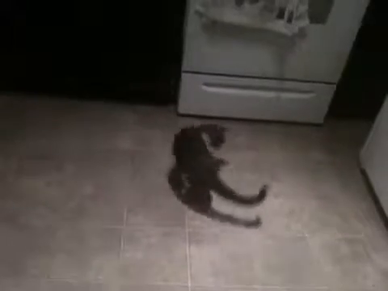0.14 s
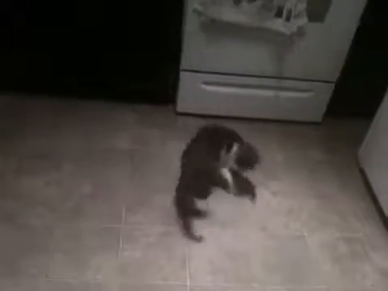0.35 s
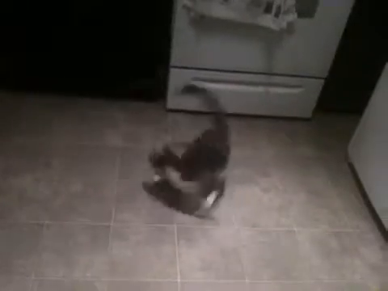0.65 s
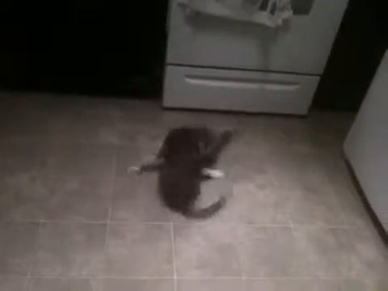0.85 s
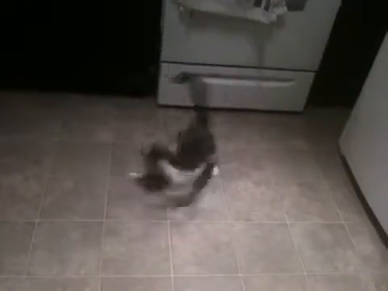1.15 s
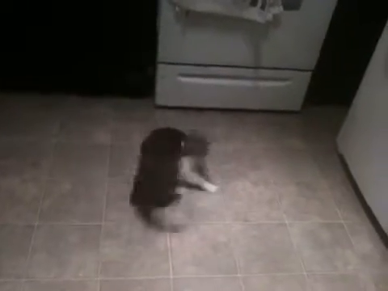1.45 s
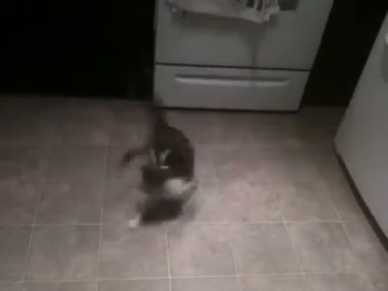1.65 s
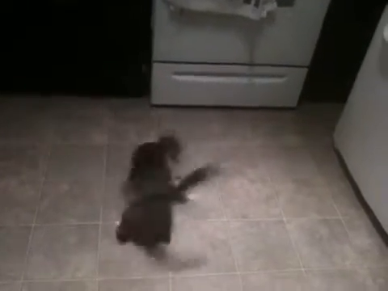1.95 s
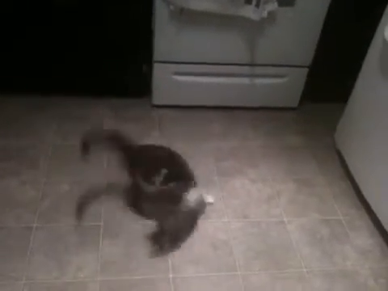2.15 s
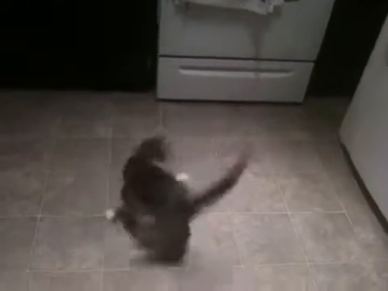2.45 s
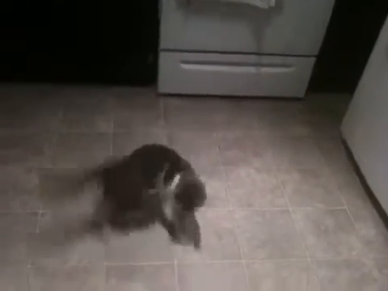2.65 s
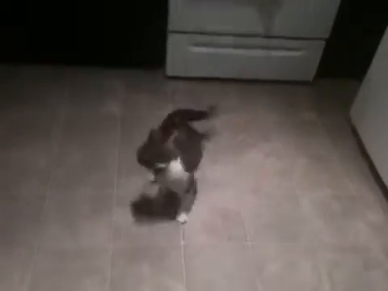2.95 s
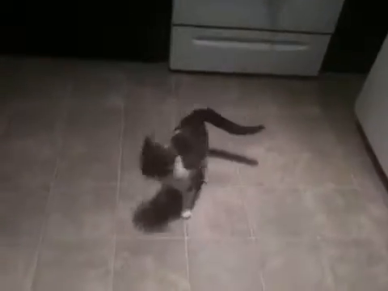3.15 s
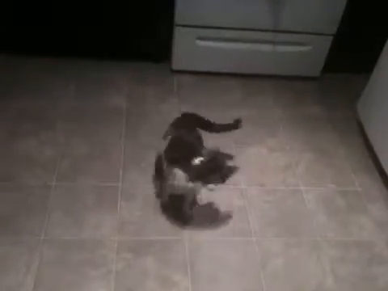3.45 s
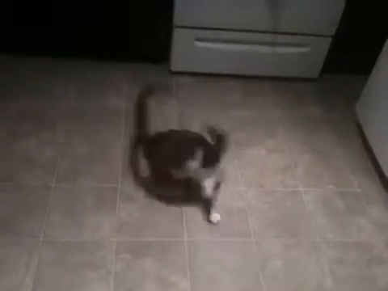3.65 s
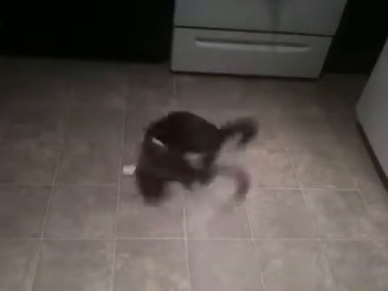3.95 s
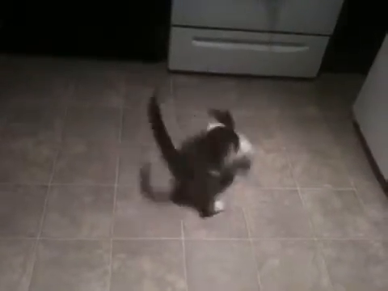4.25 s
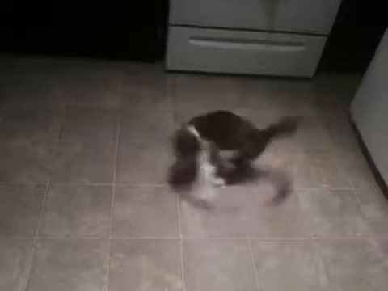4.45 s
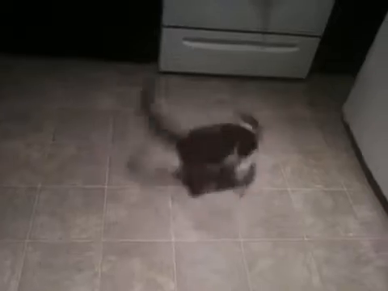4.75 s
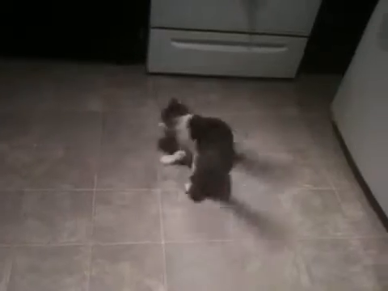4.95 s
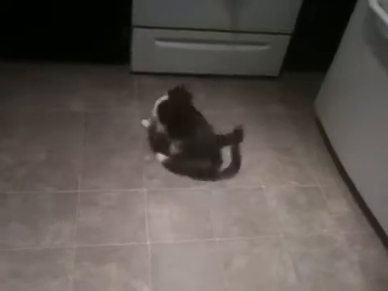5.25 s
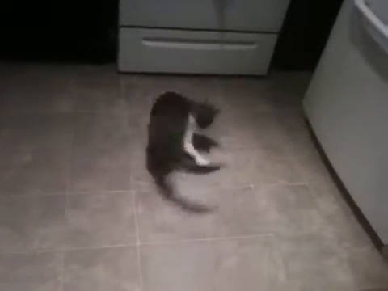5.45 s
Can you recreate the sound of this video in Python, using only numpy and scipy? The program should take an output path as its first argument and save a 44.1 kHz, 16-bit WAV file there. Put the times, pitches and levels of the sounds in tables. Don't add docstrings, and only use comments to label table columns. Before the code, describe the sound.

A kitten whirls after its tail on a tiled kitchen floor. Its tiny collar bell gives high, dry, clattering jingles in irregular clusters, densest in the first half, while soft low paw thuds, pad slaps and claw ticks patter beneath. The jingling thins toward the end, leaving a few steps and a sliding scuff. The hard room adds short reverberation; a small handheld microphone adds hiss and a very faint high whine.

```python
import sys
import numpy as np
from scipy import signal
from scipy.fft import rfft, irfft, next_fast_len
from scipy.io import wavfile
from scipy.ndimage import uniform_filter1d

SR = 44100
rng = np.random.default_rng(int(sys.argv[2]) if len(sys.argv) > 2 else 0)


def volts_from_decibels(level):
    exponent = np.asarray(level, float) / 20
    return 10 ** exponent


def unload_wav(signal):
    wavfile.write(
        sys.argv[1],
        SR,
        np.round(np.clip(np.atleast_2d(signal).T, -1, 1) * 32767).astype(np.int16),
    )


N = 246959

# mode_hz, t60_s
SHELL_MODES = [(6470, 0.024), (6800, 0.0072), (15000, 0.035), (15400, 0.021)]
# mode_hz, level_db, t60_s, phase_turns
CLACK_MODES = [(6060, -3, 0.0027, 0), (7090, 11, 0.0015, 0.08), (8100, -10.5, 0.0015, 0.53),
               (5300, -9, 0.0015, 0.14)]


def evened(x):
    return x / np.sqrt(np.mean(x ** 2) + 1e-20)


def read(points, hz):
    f, value = np.transpose(points)
    return np.interp(np.log(hz + 1), np.log(f + 1), value)


def curve(rows, index):
    rows = np.array(rows)
    return np.interp(np.arange(N) / SR, rows[:, 0], rows[:, index])


def add(mix, s, sound):
    part = mix[round(s * SR):][:len(sound)]
    part += sound[:len(part)]


def ring(t, hz, db, t60, turn=0):
    return volts_from_decibels(db - 60 * t / t60) * np.sin(2 * np.pi * (hz * t + turn))


def band_pass(x, order, low_hz, high_hz):
    return signal.sosfilt(signal.butter(order, [low_hz, high_hz], "band", fs=SR, output="sos"), x)


def coloured(x, points):
    size = next_fast_len(len(x))
    gain = volts_from_decibels(read(points, np.fft.rfftfreq(size, 1 / SR)))
    return evened(irfft(rfft(x, size) * gain, size)[:len(x)])


def grains(per_s, spread_db):
    size = volts_from_decibels(spread_db * np.minimum(rng.exponential(1, N), 4)) * rng.choice([-1., 1.], N)
    return size * (rng.random(N) < per_s / SR)


def camera_floor():
    # freq_hz, density_db
    air = [(12, -37), (20, -27), (70, -31.5), (106, -9.5), (181, -5.5), (214, -7), (433, -9.5),
           (699, -14.5), (1130, -17), (1630, -18.5), (2350, -18.5), (17000, -23)]
    # line_hz, rms_db
    whine_lines = [(14853, -93), (14912, -92), (14971, -86), (15030, -85), (15089, -93), (15148, -96)]
    t = np.arange(N) / SR
    whine = sum(np.sqrt(2) * volts_from_decibels(db) * np.sin(2 * np.pi * (hz * t + rng.random())) for hz, db in whine_lines)
    return volts_from_decibels(-67.5) * coloured(rng.standard_normal(N), air) + whine


def rattle():
    # time_s, level_db
    rolling = [(0.2, -65.5), (0.85, -69), (1.06, -49), (1.2, -52.5), (1.69, -53), (1.84, -59), (1.97, -71),
               (2.22, -47), (2.42, -50), (2.6, -49), (2.91, -55), (3.03, -48), (3.16, -66), (3.75, -51.5),
               (4.0, -64), (4.62, -48.5), (4.85, -58), (5.12, -80)]
    t = np.arange(3000) / SR
    sway = uniform_filter1d(uniform_filter1d(rng.standard_normal(N), 500), 500)
    jerks = volts_from_decibels(4.5 * np.clip(evened(sway), -3, 1.2))
    light_db = [-22.5, -10, -40, -53.5]
    modes = [(hz, db, life) for (hz, life), db in zip(SHELL_MODES, light_db)] + CLACK_MODES
    shell = np.zeros(N)
    for mode in modes:
        response = ring(t, *mode) * (1 - np.exp(-t / 0.00082)) ** 2
        shell += signal.oaconvolve(grains(300, 3.3) * jerks, response)[:N]
    spinning = abs(np.arange(N) / SR - 2.72) < 2.44
    return volts_from_decibels(curve(rolling, index=1) - 5) * evened(shell) * spinning


def kitchen(x):
    # freq_hz, t60_s
    decay = [(150, 0.36), (700, 0.3), (2000, 0.38), (6500, 0.35), (15000, 0.074)]
    taps, step = np.zeros((3, SR // 2)), 20
    slots = np.arange(200, SR // 2 - step, step)
    at = slots + rng.integers(0, step, (3, len(slots)))
    np.put_along_axis(taps, at, rng.choice([-1., 1.], at.shape), 1)
    hz, t, z = signal.stft(taps, SR, nperseg=512)
    tails = signal.istft(z * volts_from_decibels(-60 * t / read(decay, hz)[:, None]), SR, nperseg=512)[1]
    half_turns = 2.7 * np.arange(N) / SR + np.arange(3)[:, None] / 3
    turning = np.sqrt(2 / 3) * np.cos(np.pi * half_turns)
    return signal.fftconvolve(x * turning, tails / np.linalg.norm(tails[0]), axes=1)[:, :N].sum(0)


def strikes():
    # start_s, peak_db, twin_db (upper twin mode, relative), bouncing_t60_s
    shakes = [(.6806, -35.5, 26, 0.032), (1.007, -31.5, 4, 0.021), (1.0369, -28, 2, 0.043),
              (1.1508, -18.5, -39, 0.023), (1.1972, -31.5, -7, 0.018), (1.257, -28.5, -32, 0.0098),
              (1.3473, -31, 6, 0.041), (1.522, -31, 7, 0.032), (1.7566, -25, 1.5, 0.02),
              (2.0492, -31.5, 5, 0.051), (2.0572, -33, -6, 0.038), (2.2053, -22.5, 4, 0.03),
              (2.2538, -27.5, 9, 0.054), (2.2881, -23, 7, 0.013), (2.386, -21, 11, 0.011),
              (2.3935, -31, -1, 0.017), (2.4209, -29.5, -36, 0.0065), (2.4443, -32, 18, 0.024),
              (2.5412, -29.5, 3, 0.051), (2.7706, -27, 3, .017), (2.8015, -27, 8, 0.015),
              (2.9312, -29.5, 14, 0.01), (2.9892, -26.5, -24, 0.012), (3.0505, -30, -6, 0.039),
              (3.238, -30, 15, 0.013), (3.2735, -31, 0, 0.043), (3.7147, -32.5, -2, 0.031),
              (3.922, -35, 18, 0.042), (4.3879, -30.5, -4, 0.077), (4.4125, -27.5, 11, 0.043)]
    # start_s, peak_db, bouncing_t60_s
    further_shakes = [(.2907, -52.5, .022), (.5586, -54, 0.0084), (.7433, -41.5, 0.11), (.7876, -35, 0.019),
                      (.9315, -47.5, 0.012), (1.2261, -36, 0.019), (1.3269, -36, 0.021), (1.4691, -37.5, 0.088),
                      (1.6377, -35.5, 0.021), (1.6586, -31.5, 0.021), (1.7345, -42, 0.12), (2.005, -39, 0.022),
                      (2.6309, -45, 0.19), (2.7295, -34.5, 0.014), (2.9647, -39, 0.0028), (3.1727, -35.5, 0.13),
                      (3.1896, -36, 0.023), (3.3228, -47, 0.026), (3.4483, -35.5, 0.05), (3.5229, -40, 0.034),
                      (3.5438, -33, 0.02), (3.6728, -45, 0.05), (3.8844, -32, 0.069), (3.9872, -36, 0.054),
                      (4.04, -35.5, 0.016), (4.2219, -43, 0.033), (4.5052, -33.5, 0.015), (4.6384, -33, 0.0087),
                      (4.7476, -48, 0.041), (5.0494, -44, 0.038)]
    # start_s, peak_db
    stray_taps = [(.6983, -44), (.7763, -39), (1.3069, -36.5), (1.51, -37), (1.942, -49), (2.1859, -38),
                  (2.461, -34), (2.5232, -37.5), (2.6035, -35.5), (3.3623, -43), (3.514, -51), (4.153, -46),
                  (4.2383, -41), (4.6249, -46), (4.7765, -44.5), (5.4192, -54)]
    out, t = np.zeros(N), np.arange(5000) / SR
    common_twin_db, tap_t60_s = 3, .004
    rows = shakes + [(s, db, common_twin_db, t60) for s, db, t60 in further_shakes]
    rows = rows + [(s, db, common_twin_db, tap_t60_s) for s, db in stray_taps]
    chances = rng.random((len(rows), len(t)))
    spots = rng.standard_normal((len(rows), len(SHELL_MODES) + 2, len(t)))
    detunes = 1 + 0.0045 * rng.standard_normal(len(rows))
    clack = sum(ring(t, *mode) for mode in CLACK_MODES)
    fizz = band_pass(spots[:, -1], 3, 4500, 14500)
    for (s, db, twin_db, t60), chance, spot, detune, tick in zip(rows, chances, spots, detunes, fizz):
        over_db = -38 + 0.37 * twin_db + 7 * (2 * chance[0] - 1)
        fade = volts_from_decibels(-60 * t / np.clip(t60, .002, .3) / 5.2)
        bounces = .3 * (chance < 600 / SR) * spot * fade
        bounces[:, [0, round(.0012 * SR), round(.003 * SR)]] = [.5, .8, .6]
        levels_db = [0, twin_db + 0.1, over_db, over_db]
        voices = [ring(t, hz * detune, d, life) for (hz, life), d in zip(SHELL_MODES, levels_db)] + [clack]
        rise = (1 - np.exp(-t / 0.00049)) ** 2
        shell = sum(signal.oaconvolve(b, voice * rise) for b, voice in zip(bounces, voices))
        add(out, s, volts_from_decibels(db + 2.5) * shell / abs(shell).max())
        tick_db = -25.5 + 0.16 * (db + 34)
        add(out, s, volts_from_decibels(db + tick_db - 60 * t / 0.065) * tick * (1 - np.exp(-t / 0.0013)))
    return out


def slaps():
    # start_s, peak_db, claw_db (relative)
    landings = [(0.387, -43, -0.5), (0.654, -66, 0), (.802, -53.5, -1), (0.912, -57, -2), (.981, -50, 7.5),
                (1.048, -41.5, 5.5), (1.08, -52, -20), (1.207, -49, -31), (1.267, -49.5, -25),
                (1.35, -54.5, 6.5), (1.617, -49, 5.5), (1.754, -45.5, -25), (1.869, -49.5, -7),
                (1.993, -55.5, 7.5), (2.175, -55.5, -17), (2.236, -55, -22), (2.436, -46, 1),
                (2.587, -55, -1), (2.716, -47, 1.5), (3.632, -73, 4), (3.685, -38.5, -45),
                (3.894, -51, 6.5), (3.919, -50, -15), (4.06, -50.5, 5), (4.165, -61, 7),
                (4.427, -42.5, 4.5), (4.709, -42.5, 3), (5.01, -55, -18), (5.113, -35.5, -37),
                (5.26, -52, -30)]
    out, t = np.zeros(N), np.arange(6000) / SR
    noise = rng.standard_normal((len(landings), len(t)))
    pad_noise = evened(band_pass(noise, 2, 300, 1150))
    claw_noise = evened(band_pass(noise, 2, 1500, 5000))
    for (s, db, claw_db), pad, claw in zip(landings, pad_noise, claw_noise):
        t60_s = 0.041 * (1 - 0.0726 * (db + 34))
        fade_db = -60 * t / np.clip(t60_s, .005, .3)
        ragged_db = 1.26 * evened(uniform_filter1d(pad ** 2, 120) - 0) - 1.26 * 0
        toes = (1 - np.exp(-t / 0.0017)) * volts_from_decibels(ragged_db - 1)
        scratch = volts_from_decibels(claw_db - 6 + 1.5 * fade_db) * claw
        add(out, s, volts_from_decibels(db - 7) * (volts_from_decibels(fade_db) * pad + scratch) * toes)
    return out


def paws():
    # start_s, peak_db, pitch_hz
    weights = [(.627, -46, 253), (.802, -51.5, 312), (0.999, -47, 356), (1.045, -45, 290),
               (1.076, -47, 170), (1.204, -47.5, 313), (1.349, -39, 321), (1.619, -47.5, 173),
               (1.761, -39.5, 303), (1.869, -47.5, 305), (1.994, -54, 161), (2.233, -46, 289),
               (2.434, -45.5, 297), (2.529, -48.5, 211), (2.72, -47.5, 193), (2.791, -56.5, 295),
               (3.684, -50, 292), (3.765, -49, 187), (3.818, -48.5, 291), (3.92, -39, 298),
               (4.063, -44.5, 302), (4.173, -48, 379), (4.343, -55, 319), (4.428, -51.5, 323),
               (4.581, -54.5, 121), (4.692, -49.5, 194), (4.709, -44, 267), (5.018, -49.5, 207),
               (5.092, -53.5, 151), (5.112, -47.5, 255)]
    # start_s, peak_db, pitch_hz
    light_steps = [(.389, -55.5, 445), (0.5, -54.5, 202), (.862, -56, 191), (.913, -56.5, 155),
                   (1.177, -51.5, 312), (1.506, -52, 315), (1.713, -51.5, 309), (2.074, -53, 291),
                   (2.174, -53, 133), (2.879, -52.5, 200), (2.945, -57.5, 153.5), (3.018, -58, 382),
                   (3.669, -52, 184), (3.895, -49, 313), (4.391, -51, 380), (4.2, -50, 166),
                   (2.599, -54, 291), (3.299, -65.5, 139), (4.858, -58, 244), (5.26, -52, 209),
                   (5.482, -56, 180), (5.536, -56, 299)]
    # mode_hz, level_db, t60_s
    floor_modes = [(144, -11.5, 0.06), (198.7, -2, 0.1), (286, 6, 0.054), (427, -8.5, 0.064),
                   (555, -8, 0.05)]
    out, t = np.zeros(N), np.arange(9000) / SR
    boom = sum(ring(t, *mode) for mode in floor_modes)
    rows, early = weights + light_steps, t[:2000]
    for (s, db, hz), noise in zip(rows, rng.standard_normal((len(rows), 2000))):
        push = noise * volts_from_decibels(-60 * early / 0.073) * (1 - np.exp(-early / 0.005))
        rumble = signal.oaconvolve(push, boom)[:len(t)]
        sag = 1 + 0.13 * np.exp(-t / 0.014)
        thud = ring(t, hz * sag, 5.34, 0.068) * (1 - np.exp(-t / 0.0048))
        add(out, s, volts_from_decibels(db) * (thud + volts_from_decibels(-0.5) * rumble / abs(rumble).max()))
    return out


def scuffs():
    # freq_hz, density_db
    rub_spectrum = [(80, -36), (200, 13), (500, 2), (1200, -3), (2500, -10), (4000, -15), (16000, -34)]
    hiss_spectrum = [(1000, 14), (2500, 3), (4500, 25), (8000, 21), (12000, 5), (17000, -104)]
    # start_s, length_s, rub_db, hiss_db
    slides = [
        (0.647, 0.26, -73.5, -82.5),
        (4.837, 0.059, -91, -71),
        (4.948, 0.064, -82, -80.5),
        (5.005, 0.094, -64, -74),
        (5.217, 0.36, -66, -86),
    ]
    # start_s, length_s, low_hz, high_hz, level_db
    brushes = [
        (.645, .1, 1900, 3300, -71),
        (5.25, .13, 700, 3000, -65),
        (3.89, .08, 5000, 10000, -56),
        (2.57, .12, 1200, 5000, -70),
        (2.95, .12, 1500, 5000, -71),
    ]
    t = np.arange(N) / SR
    rub = coloured(grains(2500, 1.5), rub_spectrum)
    hiss = coloured(grains(5200, 0.78), hiss_spectrum)
    out = np.zeros(N)
    for s, length_s, rub_db, hiss_db in slides:
        u = (t - s) / length_s
        digging_in = np.clip(u / 0.098, 0, 1)
        sliding = digging_in * volts_from_decibels(-19.5 * np.clip(u, 0, 1)) * np.clip(10 * (1 - u), 0, 1)
        out += sliding * (volts_from_decibels(rub_db + 9) * rub + volts_from_decibels(hiss_db + 17.5) * hiss)
    for s, length_s, low_hz, high_hz, db in brushes:
        brush = evened(band_pass(rub, 2, low_hz, high_hz))
        out += volts_from_decibels(db) * brush * np.sin(np.pi * np.clip((t - s) / length_s, 0, 1) ** 0.44)
    return out


def rebounds():
    # start_s, peak_db, twin_db (upper twin mode, relative)
    rebound_hits = [(0.6823, -37, 3), (0.6887, -41, -3), (0.7051, -47, -7), (0.787, -40, 19),
                    (0.8005, -37, 2), (0.9309, -49, 10), (1.0059, -33.5, 9), (1.0283, -28, -9),
                    (1.0359, -35.5, 12), (1.0532, -47, 2.0), (1.066, -34, -6), (1.0831, -37, 15),
                    (1.1821, -42, 4), (1.2039, -25, 4), (1.2109, -35, 0.0), (1.2255, -34, 7),
                    (1.2635, -30, -5), (1.2741, -41, 4), (1.3259, -32.5, -1.0), (1.3462, -39, 12),
                    (1.357, -34, -2.0), (1.3704, -44, 5), (1.3887, -41, 1.0), (1.3948, -37.5, -8),
                    (1.4082, -39.7, 6), (1.4757, -38.5, 6), (1.5209, -41, 20), (1.5347, -34.6, 12),
                    (1.5464, -42, 7.0), (1.6543, -38.0, 7), (1.6637, -42, -3), (1.6721, -42, -5),
                    (1.7521, -29.5, 13), (1.7621, -26.5, 12), (1.7835, -41, 0), (2.0043, -40, -0.5),
                    (2.0435, -36, 1.0), (2.0488, -29, 7), (2.0567, -28, 4.0), (2.0687, -29, 2),
                    (2.0742, -32, 20), (2.087, -39, -2.5), (2.093, -45, -10), (2.2035, -24.5, -9),
                    (2.2078, -25, 0.5), (2.2312, -29, 1), (2.2368, -36, 8), (2.2417, -38, -7),
                    (2.2583, -34.5, 20), (2.2743, -47, -3), (2.2795, -30, 1), (2.3878, -22.5, 19),
                    (2.3922, -16.5, 9), (2.4045, -25, 9), (2.4113, -38, 12), (2.4377, -31, 1),
                    (2.4438, -20.5, 5.5), (2.4537, -36, 11), (2.4727, -40, 8), (2.5461, -28, -3),
                    (2.5571, -32.5, 1), (2.6051, -48, -9), (2.6304, -40.1, 7), (2.6483, -42, 9),
                 (2.7134, -36, 10), (2.7186, -38.6, 11), (2.7263, -36, 0), (2.731, -34, 2.0),
                 (2.7441, -37, 6), (2.7707, -32, 1.0), (2.8173, -29.5, 1), (2.8336, -38.0, -2),
                 (2.8436, -41, 7), (2.9374, -41, 13), (2.9641, -34, 8), (2.9941, -28, -4),
                 (3.006, -27, -1.0), (3.0503, -27.5, 6), (3.0743, -37.9, 0), (3.0803, -32, 9),
                 (3.0875, -41, 2), (3.1891, -32, 0.0), (3.2336, -37, 9), (3.2376, -26.5, 6),
                 (3.2565, -46, 3.0), (3.2622, -39, 15), (3.2729, -26.9, -3), (3.2974, -31.5, 10),
                 (3.3041, -33.5, 6), (3.3227, -34.5, -9), (3.333, -39, -4), (3.3623, -39.5, -6),
                 (3.4635, -43, -4), (3.5142, -36.6, 5), (3.551, -37, -6), (3.6827, -42, 8),
                 (3.7077, -42, -3), (3.7147, -30.5, 5), (3.7267, -30, 4), (3.7474, -42, -1.0),
                 (3.7512, -42, 1), (3.7595, -34, 1.0), (3.9143, -38, 7), (3.9328, -36.3, 1.0),
                 (3.9805, -38, 8), (3.9871, -37.5, 6), (3.9937, -36, 3), (4.0213, -39.5, 10),
                 (4.0391, -31.5, 3.0), (4.0454, -33, 7), (4.1524, -43.3, -3), (4.2134, -40.4, 2.0),
                 (4.2205, -35.5, 9), (4.2302, -33, -4), (4.3875, -30, 9), (4.4419, -29, 9),
                 (4.4794, -41, 5.0), (4.5386, -40, 7), (4.6263, -38, -6), (4.7498, -44, -2),
                    (1.1465, -29, -7), (1.1555, -37, -25), (1.1975, -25.5, -3), (2.2125, -25, -8),
               (2.2165, -27.5, -8), (2.2955, -27.5, 9), (2.776, -27, -8), (2.808, -30, 0),
               (4.245, -37, -10), (4.252, -33.5, -10), (4.258, -45, -14), (4.4075, -30, 6), (4.427, -32, 4),
               (4.431, -33, 13), (.698, -36, 2), (.7435, -42, 14)]
    out, t = np.zeros(N), np.arange(3000) / SR
    click_db, overtone_db = -18, -35
    clack = volts_from_decibels(click_db) * sum(ring(t, *mode) for mode in CLACK_MODES)
    rise = (1 - np.exp(-t / 0.00059)) ** 2
    for s, db, twin_db in rebound_hits:
        levels_db = [0, twin_db, overtone_db, overtone_db]
        modes = sum(ring(t, hz, d, life) for (hz, life), d in zip(SHELL_MODES, levels_db))
        shell = (clack + modes) * rise
        add(out, s, volts_from_decibels(db) * (shell / abs(shell).max() + volts_from_decibels(click_db) * (t == 0)))
    return out


def snaps():
    # start_s, peak_db, low_hz, high_hz
    claw_snaps = [(0.8373, -39, 3000, 14000), (1.0, -31.5, 3200, 11800), (1.3016, -48, 3500, 12000),
                  (1.867, -43, 2000, 10000), (2.3355, -38, 3500, 10000), (2.528, -41, 8000, 16000),
                  (2.5503, -32, 890, 7300), (3.885, -48, 3000, 11000), (4.1331, -54, 3000, 12000),
                  (4.157, -45, 3500, 13000), (4.233, -34, 2590, 7000), (4.3385, -45, 3000, 14000),
                  (4.4243, -45, 600, 4000), (5.1135, -42.5, 500, 2800)]
    out = np.zeros(N)
    impulse = 1. * (np.arange(600) == 0)
    for s, db, low_hz, high_hz in claw_snaps:
        snap = band_pass(impulse, 2, low_hz, high_hz)
        add(out, s, volts_from_decibels(db) * snap / abs(snap).max())
    return out


def claws():
    # start_s, level_db, t60_s
    claw_ticks = [(.838, -46, 0.04), (1.304, -47.5, 0.016), (1.523, -47, 0.035), (1.87, -46, 0.015),
                  (2.335, -43, 0.024), (2.552, -40, 0.0087), (3.636, -67, .006), (4.132, -49.5, 0.019),
                  (4.158, -49, 0.032), (4.234, -40.5, 0.032), (4.339, -51.5, 0.11), (4.599, -54, 0.16),
                  (5.014, -63, 0.063), (5.541, -51, 0.011)]
    out, t = np.zeros(N), np.arange(2000) / SR
    noise = band_pass(rng.standard_normal((len(claw_ticks), len(t))), 2, 2600, 8500)
    snap = volts_from_decibels(31) * band_pass(1. * (t == 0), 1, 800, 6500)
    for (s, db, t60), tick in zip(claw_ticks, noise):
        add(out, s, volts_from_decibels(db - 60 * t / t60) * tick + volts_from_decibels(db) * snap * (t60 < .008))
    return out


def knocks():
    # start_s, peak_db, pitch_hz, t60_s
    floor_knocks = [(.979, -47, 332, 0.047), (1.349, -41.5, 179, 0.075), (1.617, -39.5, 190, 0.12),
                    (1.758, -45.5, 351, 0.12), (1.87, -52, 156, 0.073), (1.995, -54.5, 462, 0.065),
                    (2.175, -51, 540, 0.036), (2.72, -51, 300, 0.021), (2.795, -56.5, 296, 0.15),
                    (3.022, -52.5, 395, .04), (4.165, -52, 410, .06), (5.089, -38.5, 154, 0.044),
                    (5.113, -43.5, 205, 0.079), (3.683, -49, 535, 0.042), (2.433, -47, 169, 0.045)]
    out, t = np.zeros(N), np.arange(6000) / SR
    for s, db, hz, t60 in floor_knocks:
        add(out, s, ring(t, hz, db + 4.5, t60) * (1 - np.exp(-t / 0.0029)))
    return out


def squeaks():
    # start_s, length_s, from_hz, to_hz, level_db
    pad_squeaks = [
        (4.53, .14, 2050, 2200, -83),
        (5.25, .21, 1490, 1460, -70),
    ]
    # multiple, level_db
    partials = [
        [(1, 0)],
        [(3.5, -3), (4, 0), (4.3, -1), (5, -4), (6, -3), (7, -6), (8, -9), (9, -10)],
    ]
    out = np.zeros(N)
    for (s, length_s, from_hz, to_hz, db), orders in zip(pad_squeaks, partials):
        count = int(length_s * SR)
        wobble = evened(uniform_filter1d(rng.standard_normal(SR), 150))[:count]
        turns = np.cumsum(np.linspace(from_hz, to_hz, count) * (1 + 0.015 * wobble)) / SR
        tone = sum(volts_from_decibels(d) * np.sin(2 * np.pi * k * turns) for k, d in orders)
        add(out, s, volts_from_decibels(db) * evened(tone) * signal.windows.tukey(count, .6))
    return out


def scene():
    high_pass = signal.butter(2, 4300, "high", fs=SR, output="sos")
    bell = signal.sosfilt(high_pass, strikes() + rattle() + rebounds())
    feet = paws() + slaps() + claws() + scuffs() + squeaks()
    near = snaps() + knocks()
    room = kitchen(volts_from_decibels(-11) * bell + volts_from_decibels(-4.5) * feet + volts_from_decibels(-14.5) * near)
    return (bell + feet + near + room)[None]


def gate_weak_bands(x):
    # freq_hz, threshold_db (relative to the loudness of the moment)
    gate_threshold = [(2000, -64), (3500, -58), (5000, -58), (8000, -54), (11500, -50), (14000, -49.5),
                      (15200, -56), (16300, -47)]
    hz, t, z = signal.stft(x, SR, nperseg=1024, noverlap=512)
    width = 8
    band = np.arange(len(hz)) // width
    power = abs(z[0]) ** 2
    centre = np.minimum(band * width + width // 2, len(hz) - 1)
    band_db = 10 * np.log10(uniform_filter1d(power, width, 0)[centre] + 1e-20)
    loud_db = -48 + .6 * (10 * np.log10(power.sum(0) + 1e-20) + 48)
    whim_db = 3 * rng.standard_normal((len(t), band[-1] + 1)).T[band]
    kept = band_db > loud_db + read(gate_threshold, hz)[:, None] + whim_db
    return signal.istft(z * kept, SR, nperseg=1024, noverlap=512)[1][:, :N]


def band_limit(x):
    return signal.sosfilt(signal.butter(12, 17100, fs=SR, output="sos"), x)


def record(dry):
    thin = signal.sosfilt(signal.butter(8, 117, "high", fs=SR, output="sos"), dry)
    mix = gate_weak_bands(thin + volts_from_decibels(-17.5) * dry + camera_floor())
    return band_limit(mix)


dry = scene()
out = record(dry)
unload_wav(out)
```